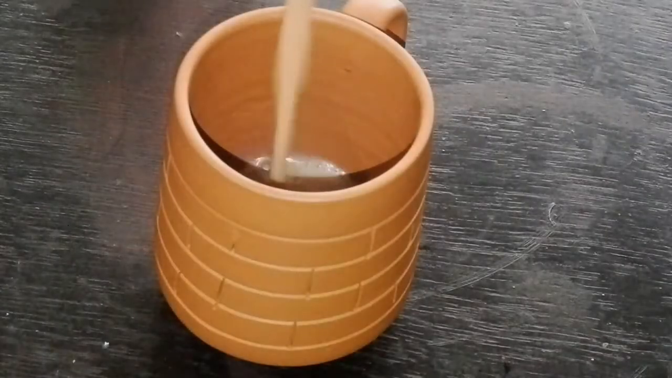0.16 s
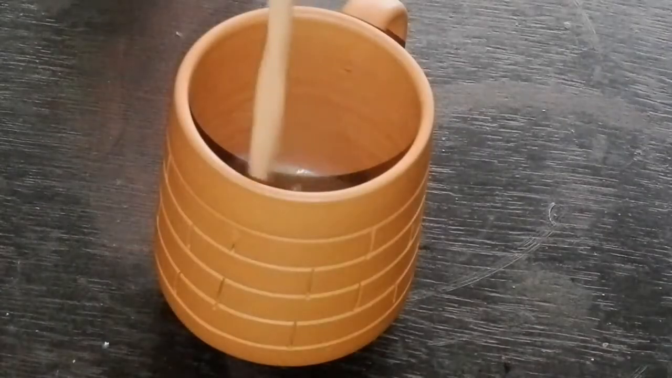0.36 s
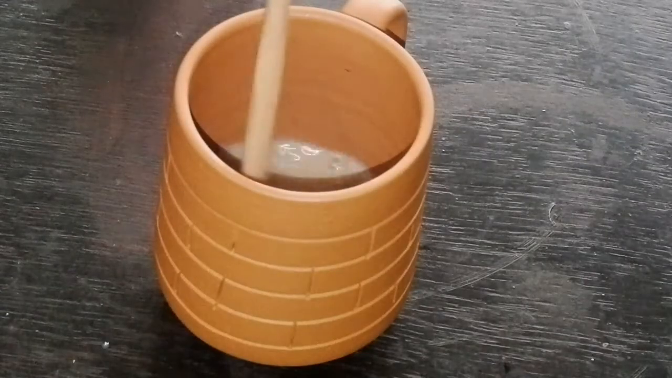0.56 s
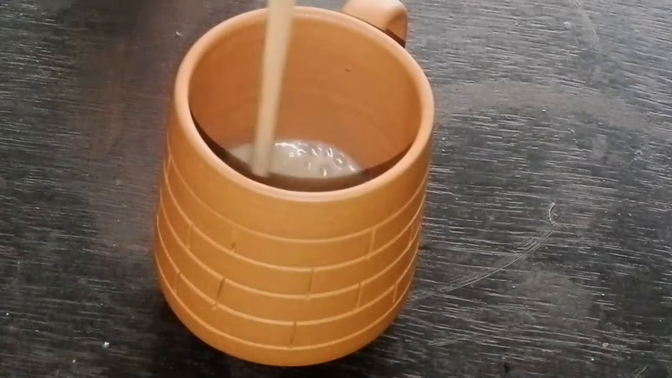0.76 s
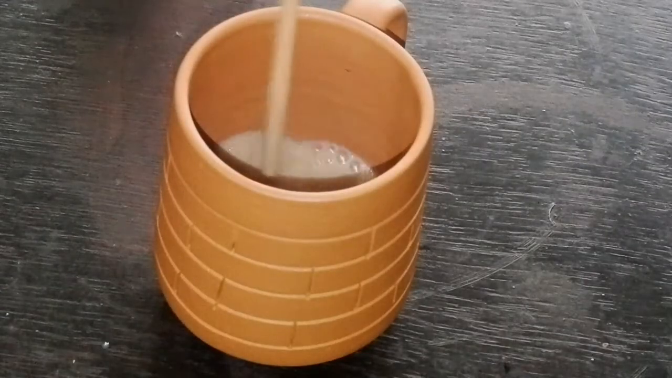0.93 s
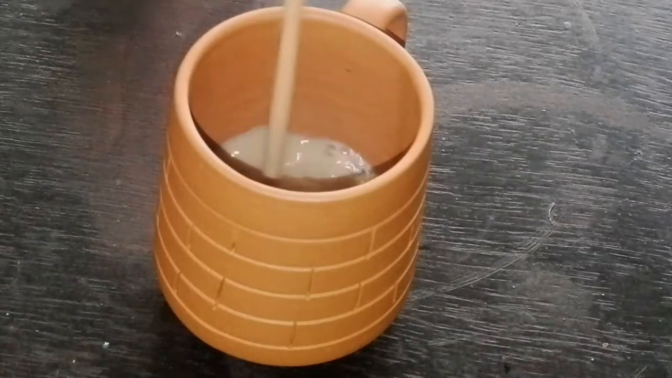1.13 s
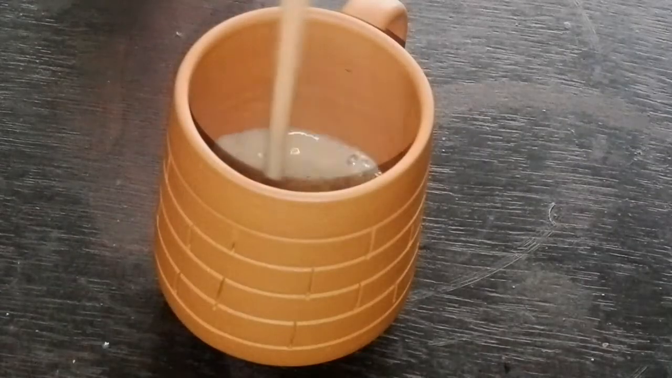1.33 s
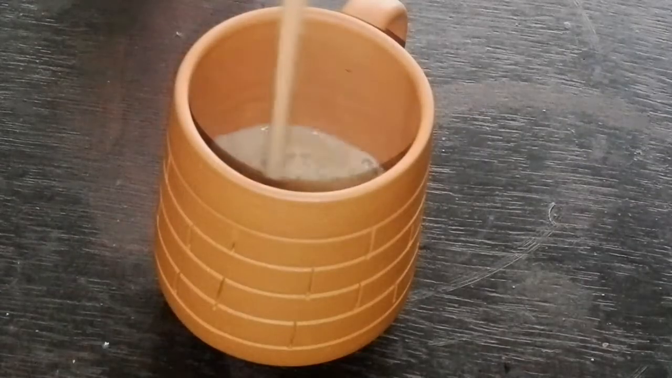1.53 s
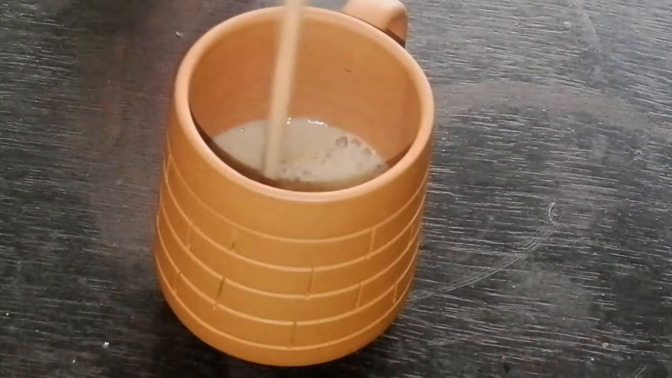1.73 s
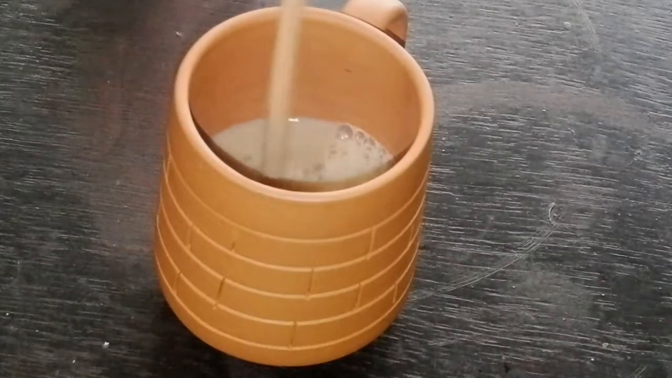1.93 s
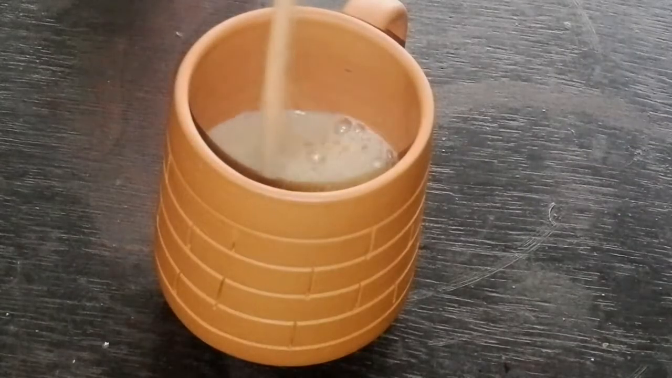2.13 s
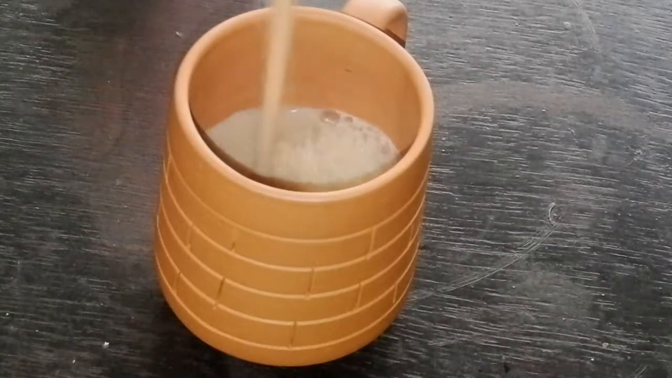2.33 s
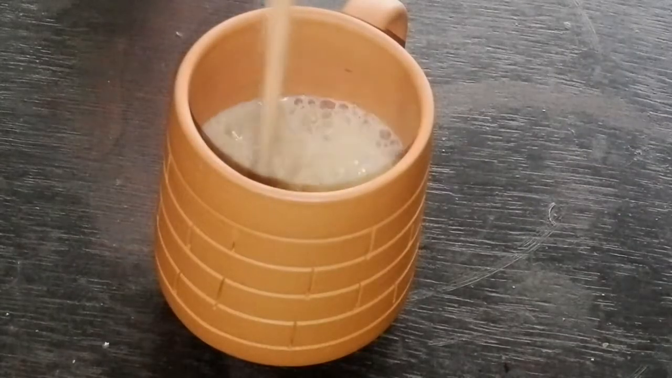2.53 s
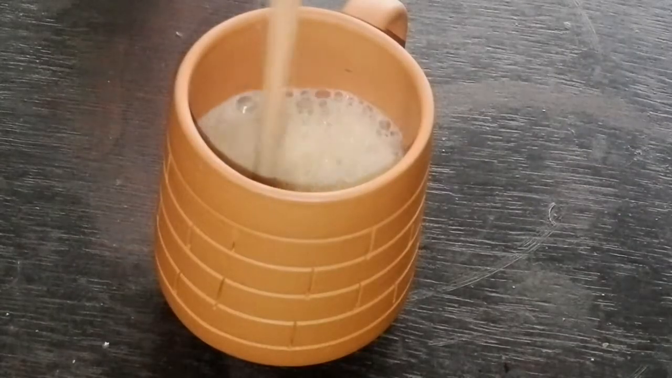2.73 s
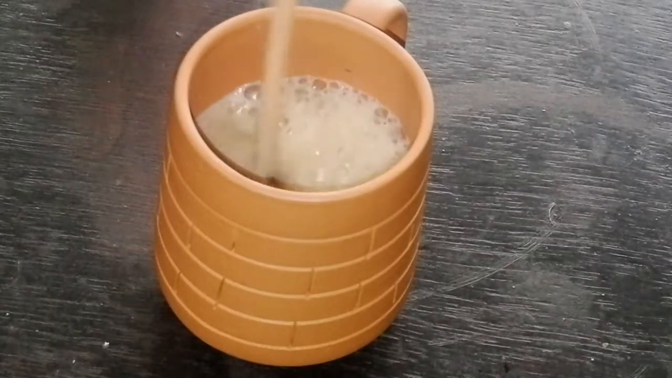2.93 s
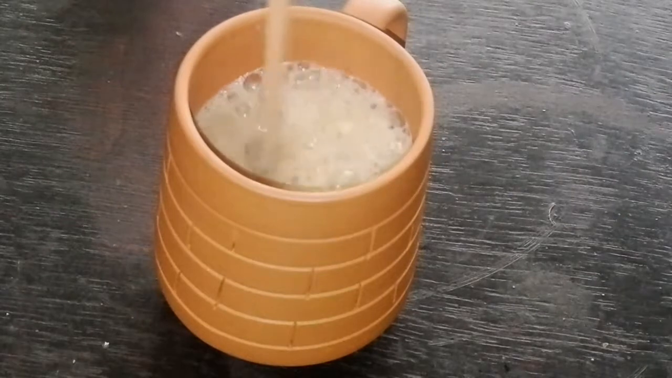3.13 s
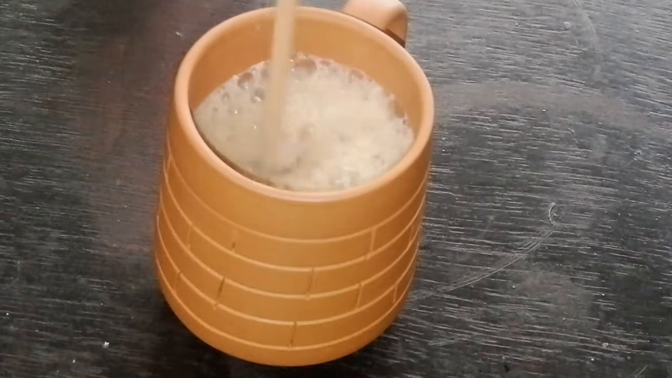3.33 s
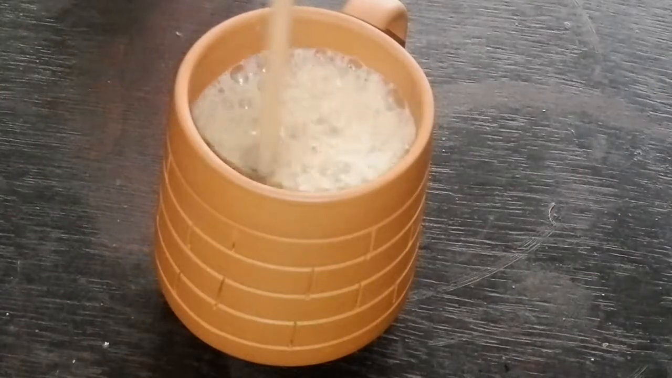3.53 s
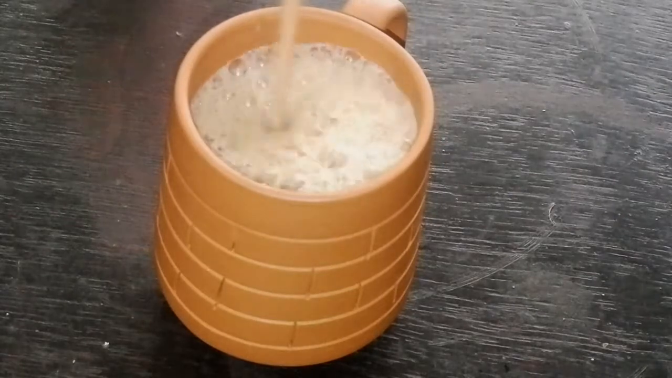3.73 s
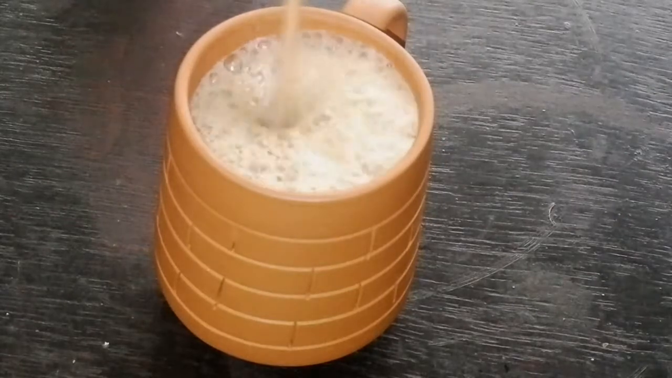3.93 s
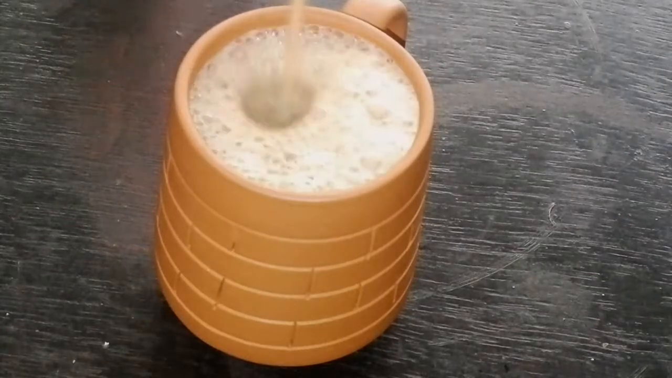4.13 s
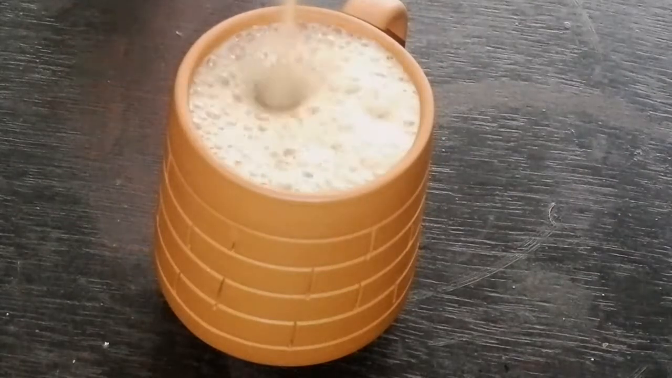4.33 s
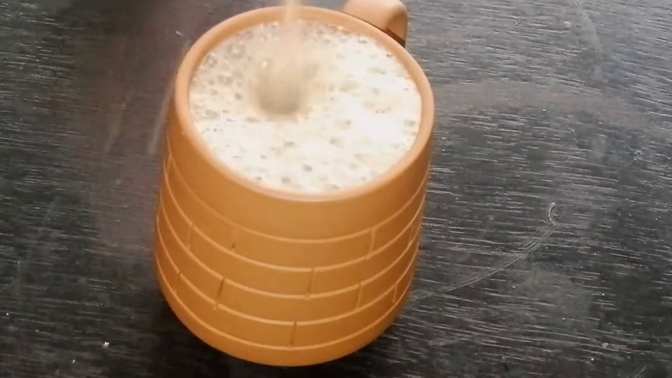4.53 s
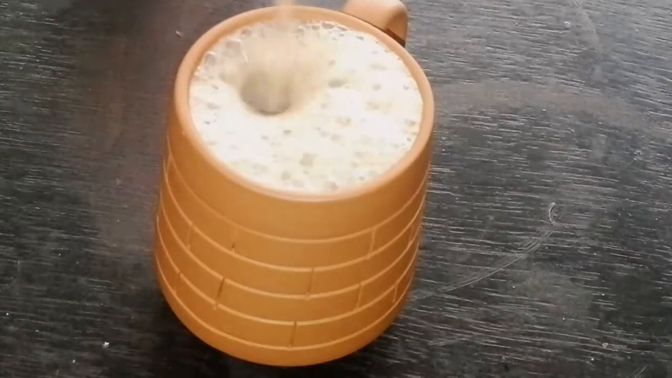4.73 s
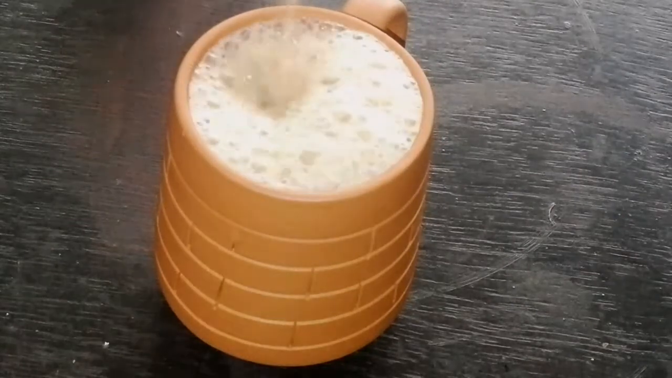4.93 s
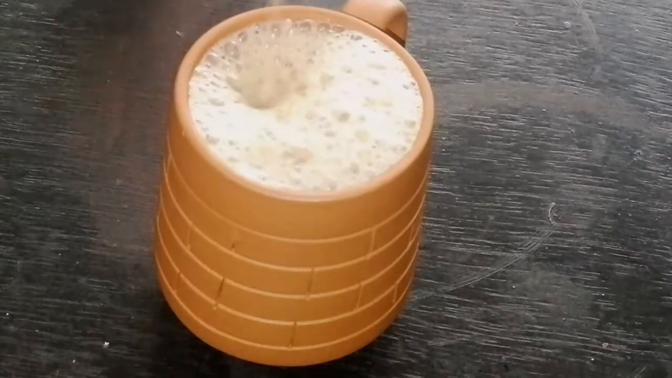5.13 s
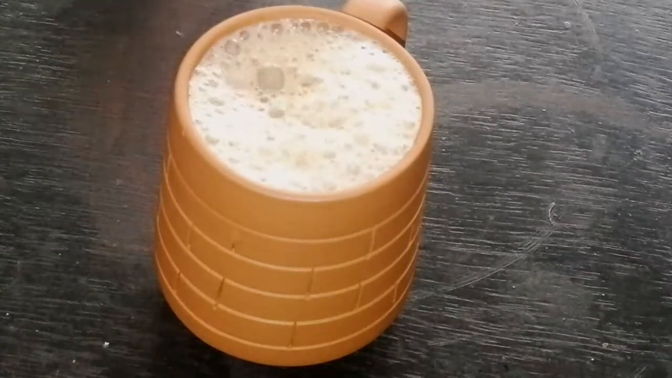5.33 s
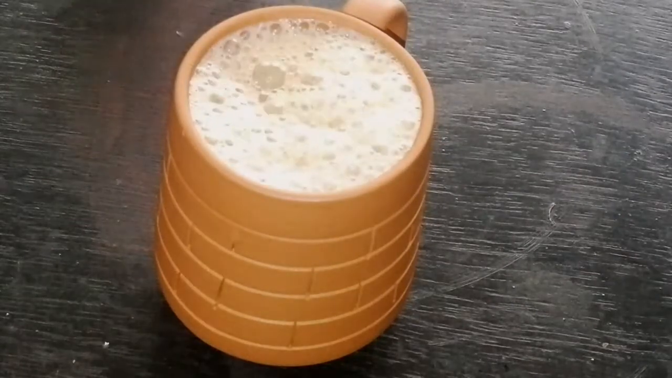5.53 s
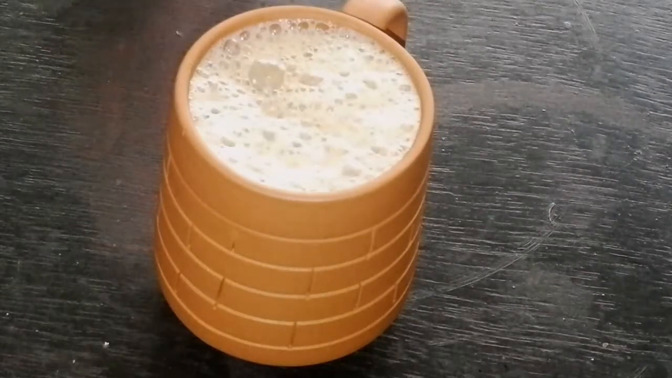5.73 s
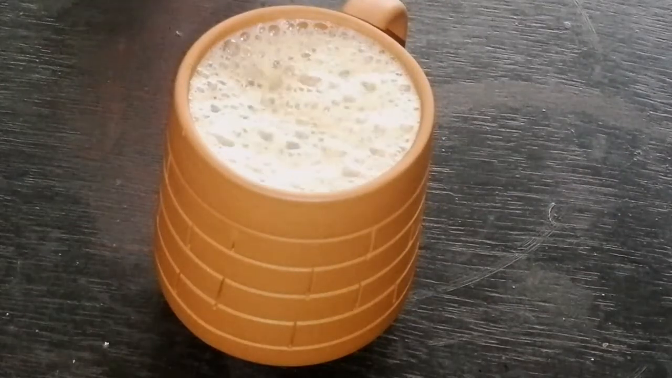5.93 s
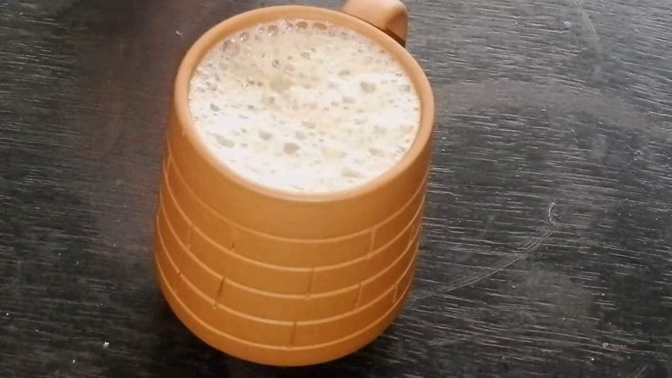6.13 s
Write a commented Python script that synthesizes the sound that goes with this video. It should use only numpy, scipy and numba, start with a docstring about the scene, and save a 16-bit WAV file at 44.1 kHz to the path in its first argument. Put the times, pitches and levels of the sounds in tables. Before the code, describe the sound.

Close-up of tea poured from height into a clay mug: crisp patter, rapid rising plops, foamy gurgling, an abrupt end to dying drips.

```python
"""Milky tea poured into a clay mug on a table, small room, quiet air throughout.
Fine spray and patter come first; drops tick on bare clay: noise puffs and short pings.
From 0.7 s trapped bubbles ring the air column and a bubble cloud gurgles: swarms of pings, some table thrum.
Foam fizzes from 1 s in bright noise pops; a throb near 26 Hz swells and fades from 3.9 s.
Froth damps the column ring; the pour is cut off at 5.12 s and dies away."""
import sys
import numpy as np
from scipy import signal
from scipy.fft import rfft, irfft, next_fast_len
from scipy.io import wavfile
from scipy.ndimage import uniform_filter1d, map_coordinates
from numba import njit

SR = 44100
rng = np.random.default_rng(int(sys.argv[2]) if len(sys.argv) > 2 else 0)


def store_pcm(level_fs):
    """Save levels as 16-bit WAV."""
    pcm = np.round(np.clip(level_fs, -1, 1) * 32767).astype(np.int16)
    wavfile.write(sys.argv[1], SR, np.atleast_2d(pcm).T)


N = 271712
T_S = np.arange(N) / SR
TOP_HZ = 15900  # band limit


def amp(db):
    """Decibels to gain."""
    return 10 ** (np.asarray(db) / 20)


def unit(x):
    """Scale to rms 1."""
    return x / np.sqrt(np.mean(x ** 2) + 1e-20)


def along(points, hz):
    """(f/Hz, value) points read on a log frequency axis."""
    f, v = np.transpose(points)
    return np.interp(np.log(hz + 1), np.log(f + 1), v)


def curve(rows):
    """(t/s, value) points to one value per sample."""
    s, values = np.transpose(rows)
    return np.interp(T_S, s, values)


def wobble(knots_per_s):
    """Smooth random curve."""
    knots = rng.standard_normal(int(N * knots_per_s / SR) + 4)
    return map_coordinates(knots, [np.arange(N) * knots_per_s / SR])


def filtered(x, response):
    """Multiply the spectrum by a complex response of frequency."""
    size = next_fast_len(N + SR // 2)
    return irfft(rfft(x, size) * response(np.fft.rfftfreq(size, 1 / SR)), size)[..., :N]


def butter(x, order, edge_hz, kind):
    """Butterworth filter."""
    return signal.sosfilt(signal.butter(order, edge_hz, kind, fs=SR, output="sos"), x)


def coloured(x, points, size=4096):
    """Minimum-phase filter with the gain of (f/Hz, level/dB) points."""
    cepstrum = irfft(np.log(amp(along(points, np.fft.rfftfreq(size, 1 / SR)))))
    fold = 1 + np.sign(size // 2 - np.arange(size)) * (np.arange(size) > 0)
    impulse = irfft(np.exp(rfft(cepstrum * fold)))
    return signal.fftconvolve(x, impulse[None], axes=1)[:, :N]


def modes(table, f):
    """Summed response of (f/Hz, width/Hz, level/dB) resonances."""
    return sum(amp(db) * 1j * f * w / (c * c - f * f + 1j * f * w) for c, w, db in table)


def add(track, s, sound):
    """Mix a sound into a track at time s."""
    part = track[..., max(round(s * SR), 0):][..., :sound.shape[-1]]
    part += sound[..., :part.shape[-1]]


def ping(t, hz, cycles, phase=0, onset=0.29, rise=0):
    """Ring of peak near 1; onset and decay in cycles, pitch up by share rise per decay."""
    turns = t * hz
    shape = (1 - np.exp(-turns / onset)) * np.exp(-turns / cycles)
    shape = shape / shape.max(axis=-1, keepdims=True)
    return shape * np.sin(2 * np.pi * turns * (1 + rise * turns / cycles / 2) + phase)


def bubbles(drive, rate, pitch, spread, cycles, onset, size_db, width, size, rise=0):
    """Stereo swarm of pings: scattered pitch, ring and level (loud end capped); rate per s."""
    count = int(rate * N / SR)
    at = rng.integers(0, N, count)
    now = lambda values: np.broadcast_to(values, N)[at, None]
    detune, strength, life, place = rng.standard_normal((4, count, 1))
    hz = now(pitch) * np.exp(now(spread) * detune)
    ring = now(cycles) * np.exp(0.44 * life)
    gain = now(drive) * amp(size_db * np.minimum(strength, 1.3)) * np.sqrt(hz / ring) * (hz < TOP_HZ)
    t = np.arange(size) / SR
    slots = (at[:, None] + np.arange(size)).ravel()
    sides = []
    for side in (1, -1):
        # each bubble bursts at its own spot, so its phase differs from side to side
        rings = gain * ping(t, hz, ring, side * width * place, onset * ring, rise)
        sides.append(np.bincount(slots, rings.ravel(), N)[:N])
    return np.array(sides)


def steady(x, lo_hz, hi_hz):
    """Bring the slow level of one band of x to 1."""
    power = np.mean(filtered(x, lambda hz: (hz > lo_hz) & (hz < hi_hz)) ** 2, axis=0)
    slow = uniform_filter1d(uniform_filter1d(power, SR // 8), SR // 8)
    return x / np.sqrt(np.abs(slow) + 1e-12)


# room air spectrum: f/Hz, relative density/dB
HUSH_SPECTRUM = [(25, 5), (45, -8), (110, -5.5), (240, -8.5), (400, -14.5), (850, -15.5), (2200, -14.5),
                 (5500, -21), (8500, -18.5), (12000, -24.5), (15500, -28)]
# room air: f/Hz, left-right likeness (-1 to 1)
HUSH_LIKENESS = [(60, 1), (130, 0.88), (290, 0.5), (640, -0.44), (1400, 0.21), (3100, -0.023)]
HUSH_RMS_DB = -61.5


def hush():
    """Shaped noise for quiet room air, alike on both sides in the bass."""
    turn = lambda hz: np.arccos(np.clip(along(HUSH_LIKENESS, hz), -1, 1)) / 2
    shape = lambda hz: amp(along(HUSH_SPECTRUM, hz)) * [np.cos(turn(hz)), np.sin(turn(hz))]
    mid, side = filtered(rng.standard_normal((2, N)), shape)
    return amp(HUSH_RMS_DB) * unit(np.array([mid + side, mid - side]))


POOL_S, POOL_RISE_S = 0.69, 0.26


def pool():
    """0 while the jet hits bare clay, 1 once the tea is deep enough to trap air."""
    return np.clip((T_S - POOL_S) / POOL_RISE_S, 0, 1)


# share of tea under froth: t/s, share (0-1)
FROTH_SHARE = [(1.8, 0.16), (3.7, 0.29), (4.6, 1)]


def froth():
    """Share of the tea under froth."""
    return curve(FROTH_SHARE)


# length of the air above the tea: t/s, length/m
AIR_LENGTH = [(0.65, 0.081), (0.85, 0.083), (1.25, 0.072), (1.7, 0.0661), (2.4, 0.06), (3.3, 0.0474),
              (4.4, 0.038), (5.05, 0.051)]
# bubble cloud pitch; sinks as the cloud grows, rises as the stream eases: t/s, f/Hz
CLOUD_PITCH = [(0.7, 917), (1.5, 521), (2.1, 412), (2.8, 306), (4.1, 293), (5.2, 499)]
RING_CYCLES, RING_POWER = 3.07, 1.35  # ring of the empty mug; power of air length
SOUND_M_PER_S = 343


def mug():
    """Quarter-wave air column pitch/Hz and ring/cycles; bubble cloud pitch/Hz."""
    air_m = curve(AIR_LENGTH)
    column_hz = SOUND_M_PER_S / (4 * air_m)
    return column_hz, RING_CYCLES * (air_m / air_m[0]) ** RING_POWER, curve(CLOUD_PITCH)


# steps of the stream, negative = swell then sudden drop: t/s, rush level/dB
RUSHES = [(1.169, 2), (2.416, -1), (3.823, 7), (4.358, -1.5), (4.92, 4.5)]
LULL_S, SURGE_FADE_S = 0.095, 0.14  # time constants before and after


def surge():
    """Stream level in dB: a lull, a sudden rush, a fade."""
    s, rush_db = np.transpose(RUSHES)
    age_s = T_S - s[:, None]
    shape = np.where(age_s < 0, -np.exp(-np.abs(age_s) / LULL_S), np.exp(-np.abs(age_s) / SURGE_FADE_S))
    return rush_db @ shape


# drops on clay or tea, mostly tick: t/s, tick level/dB, tick f/Hz; drop() offsets the levels
SPATTER_DROPS = [(0.0254, -38, 4940), (0.053, -29, 8790), (0.0866, -23.5, 5200), (0.1443, -25, 8900),
                 (0.1598, -27, 8300), (0.174, -20.5, 9100), (0.1892, -31, 8600), (0.200, -28.5, 5000),
                 (0.2176, -27, 9250), (0.2336, -24.5, 7800), (0.2523, -26.5, 7900), (0.273, -24.5, 5070),
                 (0.2977, -32, 7600), (0.311, -35.5, 7800), (0.342, -28, 8100), (0.4411, -35, 8300),
                 (0.475, -31.5, 4863), (0.5055, -34.5, 10200), (0.5667, -29, 4760), (0.6105, -36, 6950),
                 (0.679, -35, 8100), (0.7756, -27, 4480), (0.7876, -32.5, 8300), (0.974, -28, 7830),
                 (1.0074, -31.5, 4060), (1.171, -34, 8400), (1.2375, -41, 4030), (1.268, -32, 3900),
                 (1.3209, -30.5, 4050), (1.426, -34.5, 7600), (1.677, -30, 6400), (1.7284, -36.5, 4100),
                 (1.8338, -33, 10300), (1.856, -29.5, 9500), (2.0004, -27, 9200), (2.047, -30.5, 10300),
                 (2.157, -31, 10440), (2.4804, -35.5, 3800), (2.585, -32, 7900), (2.637, -31.5, 6700),
                 (2.867, -33, 13300), (2.899, -42, 9900), (3.084, -33.5, 5070), (3.6177, -36.5, 8600),
                 (3.857, -38, 4870), (4.1045, -27.5, 12400), (4.15, -32, 7800), (4.198, -29.5, 9400),
                 (4.3246, -33.5, 6760), (4.416, -33, 4640), (4.428, -29, 6900), (4.4677, -31, 7350),
                 (4.542, -29.5, 4770), (4.6355, -41, 4100), (5.0363, -36.5, 7500), (5.085, -30.5, 10000),
                 (5.177, -46, 9000)]
# large bubbles closing under the jet; drop() offsets gulp and tick levels:
# t/s, plop level/dB, plop f/Hz, gulp level/dB, tick level/dB
PLOP_DROPS = [(0.3318, -32.5, 1950, -62, -37), (0.342, -34.5, 2230, -63, -40),
              (0.492, -33.5, 1760, -63, -34), (0.8331, -32, 1240, -63, -38), (0.8884, -26, 1160, -47, -49),
              (0.9416, -33, 1080, -31.5, -57), (1.007, -27.5, 1150, -30, -40), (1.035, -33, 1040, -34, -46),
              (1.088, -32, 1040, -44, -37.5), (1.173, -25, 1110, -59, -31.5),
              (1.1807, -27.5, 1070, -44, -47), (1.195, -31, 1000, -33, -40),
              (1.2644, -31.5, 1120, -53, -50), (1.2996, -28, 1170, -37, -36.5),
              (1.338, -29, 1000, -39, -37), (1.353, -30, 1170, -37, -32.5), (1.412, -30, 1190, -55, -54),
              (1.497, -29, 1270, -48, -36), (1.5069, -28.5, 1090, -27, -39.5),
              (1.534, -37, 1090, -37, -36.5), (1.5735, -22, 1280, -42, -43), (1.6093, -27, 1300, -36, -43),
              (1.684, -31, 1210, -33, -36), (1.737, -29, 1410, -33.5, -51), (1.7942, -35, 1300, -31, -38),
              (1.8124, -32.5, 1314, -49, -37), (1.8558, -34, 1360, -31.5, -33),
              (1.9265, -33, 1110, -45, -52), (1.9476, -29, 1430, -34, -49), (1.999, -31, 1320, -29.5, -48),
              (2.0924, -37, 1270, -33, -38), (2.1218, -32, 1150, -36.5, -53),
              (2.157, -27.5, 1270, -41, -52), (2.2089, -23.5, 1740, -33, -55),
              (2.2753, -33, 1420, -32.5, -45.5), (2.3228, -30.5, 1420, -34, -53),
              (2.4288, -30, 1410, -32.5, -37), (2.441, -29, 1560, -44, -30.5),
              (2.5008, -25, 1490, -34, -29.5), (2.5843, -26.5, 1510, -31, -41),
              (2.6362, -31.5, 1130, -36, -56), (2.6943, -27.5, 1800, -39, -58),
              (2.771, -25.5, 1760, -26.5, -36), (2.8398, -30, 1460, -33, -40), (2.881, -29, 2540, -43, -43),
              (3.015, -29.5, 1706, -38.5, -37), (3.0833, -25.5, 1794, -35.5, -36),
              (3.141, -25.5, 1900, -38.5, -41), (3.185, -27, 2200, -38, -39), (3.2817, -31, 1875, -45, -59),
              (3.305, -26, 1880, -45, -38.5), (3.3569, -28, 2000, -43, -33.5),
              (3.3884, -30.5, 2770, -37, -36), (3.4715, -31, 1970, -54, -36),
              (3.4845, -25.5, 1760, -47, -54), (3.499, -25, 1810, -40, -59),
              (3.5696, -27.5, 1980, -48, -59), (3.6538, -25.5, 2090, -46, -54),
              (3.7486, -26.5, 2400, -59, -40), (3.779, -30.5, 2190, -50, -45), (3.823, -24, 2280, -46, -48),
              (3.827, -22.5, 2540, -42, -53), (3.8398, -20, 2250, -40, -32.5), (3.885, -23, 2830, -35, -33),
              (3.898, -24, 1840, -27.5, -51), (3.9219, -19, 2510, -29, -55),
              (3.9418, -22, 2200, -42, -30.5), (3.975, -23, 1860, -31, -47), (4.008, -46, 2350, -52, -27),
              (4.0341, -21, 1880, -35.5, -32.5), (4.105, -27, 2950, -41, -39),
              (4.1176, -26, 1880, -41, -32.5), (4.182, -23.5, 2220, -44, -33), (4.223, -28, 1940, -43, -55),
              (4.366, -23, 3060, -53, -35), (4.3768, -29, 1920, -51, -41), (4.4055, -23, 2440, -53, -51),
              (4.428, -22.5, 2280, -47, -45), (4.441, -21.5, 2770, -38, -37),
              (4.477, -28, 2100, -47, -31.5), (4.5235, -26.5, 1100, -31, -35.5),
              (4.5562, -29.5, 1880, -47, -51), (4.5798, -30, 1900, -31.5, -38),
              (4.6223, -29, 2080, -33, -37.5), (4.6458, -30, 2035, -39, -36),
              (4.6673, -27, 1980, -31.5, -35), (4.7122, -31.5, 2000, -32, -35.5),
              (4.777, -37, 890, -33, -36), (4.835, -27, 2880, -44, -35.5), (4.911, -27.5, 2900, -36, -39),
              (4.9307, -30, 1100, -38, -46), (4.942, -32, 1080, -32, -51), (5.007, -30, 1880, -37, -46),
              (5.066, -25, 1870, -56, -39), (5.2332, -38.5, 2000, -64, -55.5)]


def jet(gap_db, gap_s):
    """Lumpy jet strength, dipping briefly round each drop."""
    neck = np.zeros(N)
    for s, *_ in [*PLOP_DROPS, *SPATTER_DROPS]:
        add(neck, s - gap_s, np.hanning(int(3.0 * gap_s * SR)))
    return amp(5.1 * np.minimum(wobble(120), 1.2) + 0.34 * wobble(35) + gap_db * np.minimum(neck, 1))


# base level of the splashing at the surface: t/s, level/dB
SPLASH_LEVEL = [(0.0, -61.5), (0.32, -56.5), (1.05, -59.5), (1.36, -58.5), (1.62, -58.5), (1.99, -59),
                (2.15, -57.5), (2.7, -60.5), (2.82, -60.5), (3.25, -55), (3.57, -58.5), (3.81, -59),
                (4.04, -58), (4.17, -54.5), (4.52, -58.5), (4.96, -55), (5.24, -66), (5.45, -82.5)]


def splash_level():
    """Splashing level in dB, rushes included."""
    return curve(SPLASH_LEVEL) + surge()


# finest splashes: f/Hz, relative level/dB
SPRAY_SPECTRUM = [(2500, -38), (5000, 3.5), (7000, 4), (8800, -0.5), (11500, -1.5), (15000, -10.5)]


def crackle(drive, rate, size_db, life_ms):
    """Tiny splashes: broadband noise puffs about a millisecond long."""
    count = int(rate * N / SR)
    at = rng.integers(0, N, count)
    strength = drive[at] * amp(size_db * np.minimum(rng.standard_normal(count), 2))
    energy = np.bincount(at, strength ** 2, N)
    age = np.arange(SR // 100) / SR * 1000 / life_ms
    envelope = np.sqrt(np.abs(signal.fftconvolve(energy, age * np.exp(-age))[:N]))
    noise = envelope * rng.standard_normal((2, N))
    mid, side = filtered(noise, lambda hz: amp(along(SPRAY_SPECTRUM, hz)))
    return mid + np.array([side, -side]) * 1.1


SPRAY_DB, SPRAY_BARE_DB = -3.5, 8  # re splashing; change on bare clay


def spray(lumps):
    """Finest spray: noise puffs plus tiny bubbles, each ringing at its own pitch."""
    puffs = crackle(lumps, rate=1100, size_db=16.5, life_ms=1.0)
    beads = bubbles(lumps, rate=380, pitch=7020, spread=0.31, cycles=3.0, onset=0.32,
                    size_db=15.0, width=1.0, size=400)
    mix = unit(puffs) + amp(-2.5) * unit(beads)
    return amp(splash_level() + SPRAY_DB + SPRAY_BARE_DB * (1 - pool())) * steady(mix, 6700, 24000)


PATTER_DB, PATTER_BARE_DB = -2.5, 3  # re splashing; change on bare clay
PATTER_BARE_HZ, PATTER_DEEP_HZ, PATTER_SINK_S = 4670, 1708, 0.933
PATTER_CYCLES, PATTER_DAMPED = 2.66, 0.52  # ring in open tea; share lost on bare clay or under froth


def patter(lumps):
    """Small chirping bubbles, darker as the tea deepens."""
    hz = PATTER_DEEP_HZ + (PATTER_BARE_HZ - PATTER_DEEP_HZ) * np.exp(-T_S / PATTER_SINK_S)
    damping = np.clip(PATTER_DAMPED * np.maximum(1 - pool(), froth()), 0, .9)
    swarm = bubbles(lumps, rate=1150, pitch=hz, spread=0.556, cycles=PATTER_CYCLES * (1 - damping),
                    onset=0.23, size_db=9.5, width=0.24, size=400, rise=0.073)
    return amp(splash_level() + PATTER_DB + PATTER_BARE_DB * (1 - pool())) * steady(swarm, 3263, 4310)


GULP_SPREAD = 0.13  # log pitch scatter
TICK_CYCLES, TICK_SCATTER, TICK_LATE_S = 3.33, 0.413, 0.0022  # ring; droplets' log pitch scatter, max delay


def drop(t, plop_db, hz, ring, gulp_db, cloud_hz, tick_db, tick_hz):
    """One drop ticks, rings the air in the mug and shakes the bubble cloud."""
    gulp_hz = cloud_hz * np.exp(GULP_SPREAD * rng.normal())
    sound = (amp(plop_db) * ping(t, hz, 0.46 + 0.54 * ring, onset=0.36 * ring)
             + amp(gulp_db + 2.0) * ping(t, gulp_hz, 1.19, onset=0.22)
             + amp(tick_db + 2.5) * ping(t, tick_hz, TICK_CYCLES, onset=3.0))
    # a smaller bubble and a few droplets break off a moment later
    small_hz = hz * np.exp(0.075 / ring * rng.normal())
    add(sound, rng.uniform(0.00145, 0.004646), amp(plop_db - 5.5) * ping(t, small_hz, 1.0))
    for late, detune in zip(rng.random(size=3), rng.standard_normal(size=3)):
        droplet_hz = min(tick_hz * np.exp(TICK_SCATTER * detune), TOP_HZ)
        add(sound, TICK_LATE_S * late, amp(tick_db - 3.5) * ping(t, droplet_hz, TICK_CYCLES))
    return sound


def puff(t, db):
    """Band-passed noise puff with a soft onset of about a millisecond, at each drop."""
    noise = butter(rng.standard_normal((2, len(t))), 2, [2800, 15000], "band")
    age = t / 0.00068
    return amp(db + 1.5) * noise * age ** 2 * np.exp(-age)


DROP_T_S = np.arange(SR // 16) / SR
PUFF_LEAD_S = 0.0012
GURGLE_BARE_DB = -39  # bubble cloud's change on bare clay
SPATTER_PLOP_DB, SPATTER_BARE_DB, SPATTER_GULP_DB = -9, -21, -5  # plop re tick, its change on clay; gulp re plop


def spatters():
    """Drops smack clay or tea: mostly tick, little bubble."""
    out = np.zeros((2, N))
    column_hz, ring, cloud_hz = mug()
    bare = 1 - pool()
    for s, tick_db, tick_hz in SPATTER_DROPS:
        at = round(s * SR)
        plop_db = tick_db + SPATTER_PLOP_DB + SPATTER_BARE_DB * bare[at]
        gulp_db = plop_db + SPATTER_GULP_DB + GURGLE_BARE_DB * bare[at]
        plop_hz = column_hz[at] * (1 + bare[at])  # a thin film holds only small bubbles, an octave up
        add(out, s, drop(DROP_T_S, plop_db, plop_hz, ring[at], gulp_db, cloud_hz[at], tick_db, tick_hz))
        add(out, s - PUFF_LEAD_S, puff(DROP_T_S, tick_db))
    return out


# base level of the stream, which drives the bubbles: t/s, level/dB
STREAM_LEVEL = [(0.0, -89), (0.14, -69), (0.28, -49.5), (1.1, -49.5), (1.22, -48.5), (1.72, -47),
                (1.93, -47.5), (2.91, -49), (3.35, -49), (3.75, -48.5), (4.03, -46.5), (4.21, -48.5),
                (4.61, -45.5), (4.72, -46), (4.88, -53.5), (5.02, -54), (5.14, -56.5)]
STOP_S, STOP_DB_PER_S = 5.12, 128


def flow_level():
    """Stream level in dB without rushes, dying away once the pour is cut off."""
    return curve(STREAM_LEVEL) - STOP_DB_PER_S * np.maximum(T_S - STOP_S, 0)


COLUMN_DB, COLUMN_BARE_DB, COLUMN_FROTH_DB = 2, -8, -12.5  # re flow; change on bare clay, under froth


def column(lumps):
    """Bubbles at the air column's pitch; the longer it rings, the closer they keep to it."""
    column_hz, ring, _ = mug()
    swarm = bubbles(lumps, rate=340, pitch=column_hz, spread=0.32 / ring ** 1.53, cycles=ring,
                    onset=0.52, size_db=1.0, width=0.13, size=1000)
    level_db = flow_level() + surge() + COLUMN_DB + COLUMN_BARE_DB * (1 - pool()) + COLUMN_FROTH_DB * froth()
    return amp(level_db) * steady(swarm, 840, 3200)


COLUMN_RING_DB, COLUMN_WIDTH_HZ = -2, 100


def air_column(x):
    """Air above the tea resonates at its moving pitch, less as it shortens, until froth smothers it."""
    column_hz, cycles, _ = mug()
    carrier = np.exp(2j * np.pi * np.cumsum(column_hz) / SR)
    keep = np.exp(-np.pi * COLUMN_WIDTH_HZ / SR)
    ring = 2 * np.real(carrier * signal.lfilter([1 - keep], [1, -keep], x / carrier))
    return x + amp(COLUMN_RING_DB) * cycles / RING_CYCLES * np.clip(1 - froth(), 0, 1) * ring


# large swelling bubbles: t/s, mid f/Hz, level/dB, length/s
BLOOP_BUBBLES = [(0.252, 1056, -30.5, 0.011), (0.663, 1025, -37, 0.016), (0.864, 1140, -39.5, 0.014),
                 (0.946, 1117, -39, 0.016), (0.976, 1120, -40, 0.017), (1.222, 1133, -35.5, 0.015),
                 (1.636, 1244, -38.5, 0.014), (2.774, 295, -41, 0.02), (4.203, 300, -36, 0.025),
                 (5.004, 1028, -45, 0.015), (5.062, 1086, -42, 0.012), (5.080, 1054, -38, 0.015),
                 (5.099, 1050, -38, 0.011), (5.037, 450, -40, 0.016), (5.152, 1120, -40, 0.012),
                 (5.154, 2370, -34.5, 0.0032), (5.169, 1063, -42.5, 0.012), (5.170, 564, -46, 0.017),
                 (5.233, 1080, -51, 0.011)]
BLOOP_RISE = 0.08


def bloops():
    """Large bubbles swell and fade, pitch rising by a share as they near the surface."""
    out, t = np.zeros((2, N)), DROP_T_S
    for s, hz, db, length_s in BLOOP_BUBBLES:
        swell = np.sin(np.pi * np.minimum(t / length_s, 1)) ** 2
        turns = hz * t * (1 - BLOOP_RISE * (1 - t / length_s) / 2)
        add(out, s, amp(db) * swell * np.sin(2 * np.pi * turns))
    return out


PLOP_TICK_HZ, PLOP_TICK_SPREAD = 4211, 0.284  # centre; log scatter


def plops():
    """Large bubbles close under the jet: mostly bubble ring, with gulp and tick."""
    out = np.zeros((2, N))
    _, ring, cloud_hz = mug()
    for s, plop_db, hz, gulp_db, tick_db in PLOP_DROPS:
        at = round(s * SR)
        tick_hz = PLOP_TICK_HZ * np.exp(PLOP_TICK_SPREAD * rng.normal())
        add(out, s, drop(DROP_T_S, plop_db, hz, ring[at], gulp_db, cloud_hz[at], tick_db, tick_hz))
        add(out, s - PUFF_LEAD_S, puff(DROP_T_S, tick_db))
    return out


GURGLE_DB = -2  # re flow
GURGLE_BEST_HZ, GURGLE_DB_PER_OCTAVE = 435, 7  # loudest cloud pitch; loss to either side
CRATER_DB, CRATER_S = 5, 4.85


def gurgle(lumps):
    """Bubble cloud at its moving pitch; late on, a hollow in the froth lets it out louder."""
    cloud_hz = mug()[2]
    swarm = bubbles(lumps, rate=260, pitch=cloud_hz, spread=0.267, cycles=2.2, onset=0.31,
                    size_db=5.5, width=0.15, size=2000)
    octaves_off = np.abs(np.log2(cloud_hz / GURGLE_BEST_HZ))
    level_db = (flow_level() + surge() + GURGLE_DB + GURGLE_BARE_DB * (1 - pool())
                + CRATER_DB * (T_S > CRATER_S) - GURGLE_DB_PER_OCTAVE * octaves_off)
    return amp(level_db) * steady(swarm, 291, 1100)


CHURN_DB, CHURN_FROTH_DB, CHURN_HZ = -8, 2, 880  # re flow; rise under froth; pitch


def churn(lumps):
    """The jet stirs middling bubbles through the tea, louder as it froths."""
    swarm = bubbles(lumps, rate=420, pitch=CHURN_HZ, spread=0.359, cycles=2.94, onset=0.37,
                    size_db=5.0, width=0.22, size=1200)
    level_db = flow_level() + surge() + CHURN_DB + CHURN_FROTH_DB * froth()
    return pool() * amp(level_db) * unit(swarm)


def stream():
    """The jet breaks into lumps; each lump drives bubbles of all sizes at once."""
    lumps = jet(gap_db=-1.5, gap_s=0.0031)
    last_thread = np.interp(T_S, [5.27, 5.42], [1, 0])
    return last_thread * (gurgle(lumps) + column(lumps) + patter(lumps) + spray(lumps) + churn(lumps))


# table modes: f/Hz, width/Hz, relative level/dB
TABLE_MODES = [(106.7, 11.3, 5), (161.3, 8, 5.5), (204, 23.5, 2)]
THRUM_DB, THRUM_DB_PER_S, THRUM_FULL_S = -27.5, 5.5, 3.17  # re flow at 0 s; growth as the jet plunges deeper


def thrum():
    """The jet's push stirs the table's low modes: noise through resonances."""
    wood = unit(filtered(rng.standard_normal(N), lambda f: modes(TABLE_MODES, f)))
    level_db = flow_level() + THRUM_DB + THRUM_DB_PER_S * np.minimum(T_S, THRUM_FULL_S)
    return amp(level_db) * pool() * wood


FIZZ_DB, FIZZ_FROM_S, FIZZ_FULL_S = -7, 1, 1.7  # re splashing; foam build-up
FIZZ_PER_S, FIZZ_LIFE_S, FIZZ_EDGE_HZ = 52, 0.0014, 9500  # pop rate, time constant, lower edge


def fizz():
    """Foam bubbles burst at random, each a short, very bright noise puff."""
    foam = np.interp(T_S, [FIZZ_FROM_S, FIZZ_FULL_S, 5.1, 5.3], [0, 1, 1, 0])
    noise = rng.standard_normal((2, N))
    pops = (rng.random(N) < FIZZ_PER_S / SR).astype(float)
    age = np.arange(SR // 100) / SR / FIZZ_LIFE_S
    envelope = signal.fftconvolve(pops, age ** 2 * np.exp(-age))[:N]
    puffs = envelope * (noise + noise[::-1] / 2)  # sides partly shared
    bright = filtered(butter(puffs, 3, FIZZ_EDGE_HZ, "high"), lambda hz: hz < TOP_HZ)
    return foam * amp(curve(SPLASH_LEVEL) + FIZZ_DB) * unit(bright)


# deep throb: t/s, level/dB
THROB_LEVEL = [(3.9, -95), (4.06, -62), (4.2, -57), (4.4, -49.5), (4.7, -50), (4.9, -64), (5.2, -71),
               (5.4, -99)]


def throb():
    """Sine near 26 Hz, wavering in pitch and level, swells as the mug gets full, then fades."""
    tone = np.sin(2 * np.pi * np.cumsum(26 + 0.88 * wobble(5.43)) / SR)
    return amp(curve(THROB_LEVEL)) * unit(tone * amp(1.1 * wobble(7)))


@njit
def high_pass(x, step):
    """Two-pole high-pass with moving edge; step in radians per sample."""
    out, low, band = np.zeros_like(x), 0.0, 0.0
    for i in range(len(x)):
        low += step[i] * band
        out[i] = x[i] - low - band
        band += step[i] * out[i]
    return out


EDGE_DEEP, EDGE_BARE = 0.5, 1  # edge re cloud pitch, in deep tea and on bare clay


def hollow(x):
    """The mug lets out little below an edge tied to cloud pitch, least while tea barely covers the clay."""
    edge_hz = mug()[2] * (EDGE_BARE + (EDGE_DEEP - EDGE_BARE) * pool())
    step = 2 * np.pi * edge_hz / SR
    return np.array([high_pass(high_pass(side, step), step) for side in x])


# colour of mug and table top: f/Hz, level/dB
BODY_COLOUR = [(260, -13), (450, -6.5), (590, -6.5), (700, -4), (820, -7.5), (1030, -5.5), (1400, -7),
               (2750, -1.6), (3350, -5), (3850, -0.5), (5900, -5), (7000, -1.5), (9200, 0.23), (11500, -6),
               (15000, -12)]
# resonances round the mug, added to the direct sound: f/Hz, width/Hz, level/dB
BODY_RINGS = [(295, 30, -5), (698, 50, -1), (1085, 130, -7), (1830, 160, -14)]


def body(x):
    """Mug and table top colour the pour and add fixed resonances."""
    return filtered(coloured(x, BODY_COLOUR), lambda f: 1 + modes(BODY_RINGS, f))


# left side's phase shift by reflections, half per side: f/Hz, lag/rad (0 up to 330 Hz)
PHASE_LAG = [(330, 1.5), (520, -1.75), (690, -2.5), (900, -1.5), (1100, 2), (2000, 0)]
# left-right level, before the slow drift: f/Hz, level/dB
SIDE_TILT = [(150, 2.5), (380, -5.5), (700, 1), (1300, -2.5), (4400, -3.5), (8500, -3), (15000, 5.5)]


def placed(x, lead_ms):
    """Mug a little to the left: left side leads; balance drifts as the tea rises."""
    def half(hz):
        phase = -.5 * along(PHASE_LAG, hz) * (hz > 330) + np.pi * hz * lead_ms / 1000
        return amp(along(SIDE_TILT, hz) / 2) * np.exp(1j * phase)

    drift_db = np.interp(T_S, [1.2, 1.8, 3.2, 4.2], [2.16, 1.0, 2.2, 2.3])
    sides = filtered(x, lambda hz: np.array([half(hz), 1 / half(hz)]))
    return sides * amp([drift_db / 2, -drift_db / 2])


# room decay: f/Hz, t60/s
ROOM_DECAY = [(200, 0.19), (2000, 0.34), (12000, 0.28)]


def room(x, near_db, far_db):
    """Mug and table scatter short waves within milliseconds; the room's short tail follows."""
    hz, t, z = signal.stft(rng.standard_normal((2, SR // 3)), SR, nperseg=256)
    decay = amp(-60 * t / along(ROOM_DECAY, hz)[:, None])
    tail = signal.istft(z * decay, SR, nperseg=256)[1]
    t = np.arange(tail.shape[1]) / SR
    short_waves = butter(rng.standard_normal(tail.shape), 2, 1200, "high")
    near = short_waves * amp(-60 * t / 0.011) * (t > .001)
    far = tail * (t > .005)
    answer = sum(amp(db) * h / np.linalg.norm(h[0]) for db, h in [(near_db, near), (far_db, far)])
    wet = signal.fftconvolve(x, answer, axes=1)[:, :N]
    common = wet.mean(axis=0)  # long waves reach both sides alike
    return x + common + filtered(wet - common, lambda hz: hz / np.hypot(hz, 450))


def scene():
    """The pour in its room."""
    pour = stream() + plops() + spatters() + bloops() + fizz()
    tea = placed(body(hollow(air_column(pour))), lead_ms=0.088)
    return room(tea, near_db=-7.0, far_db=-5) + thrum() + throb() + hush()


def record(dry):
    """Nothing is kept above the band limit."""
    return filtered(dry, lambda hz: hz < TOP_HZ)


dry = scene()
out = record(dry)
store_pcm(out)
```